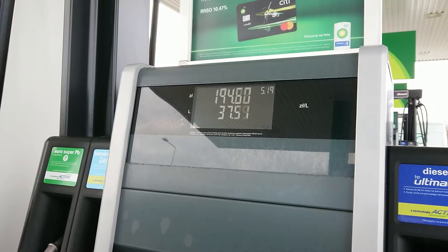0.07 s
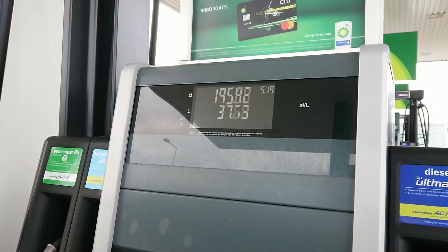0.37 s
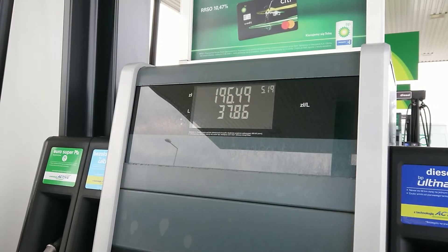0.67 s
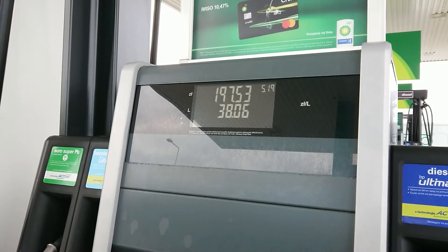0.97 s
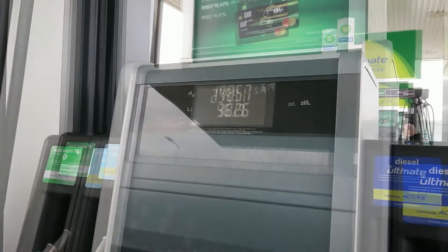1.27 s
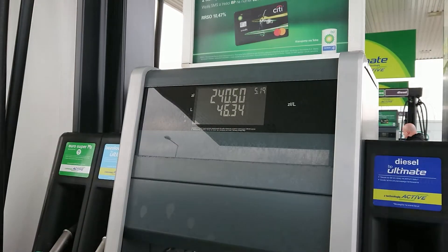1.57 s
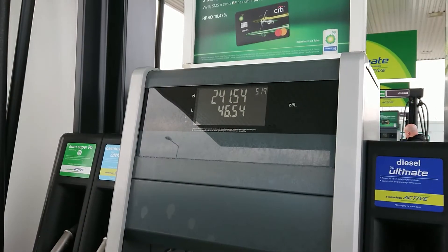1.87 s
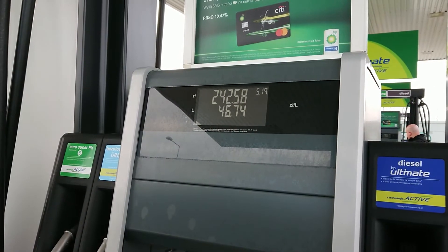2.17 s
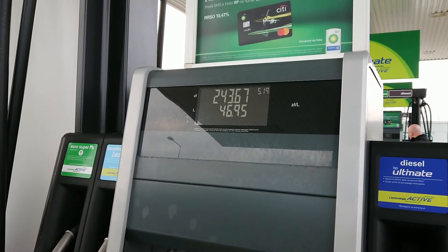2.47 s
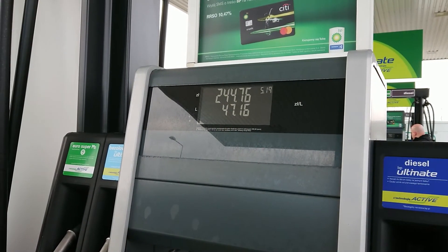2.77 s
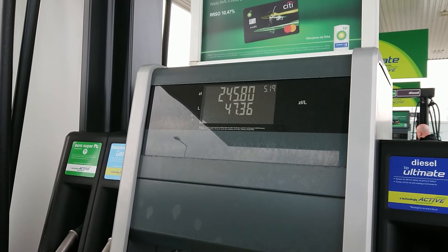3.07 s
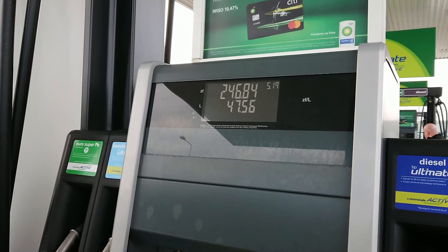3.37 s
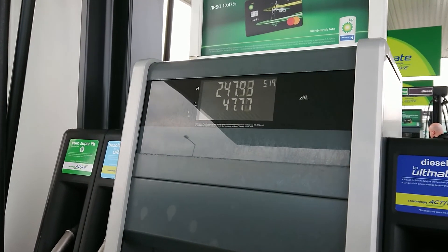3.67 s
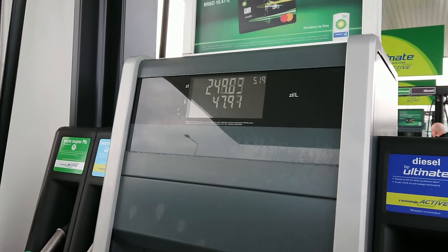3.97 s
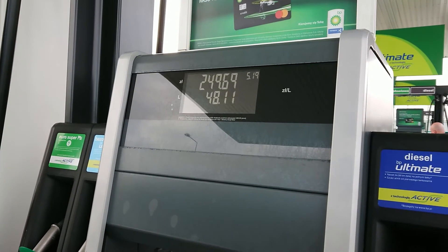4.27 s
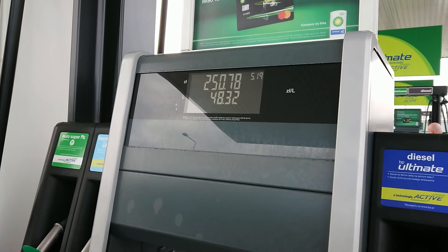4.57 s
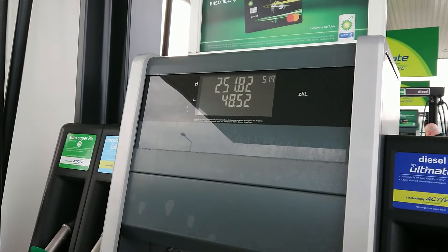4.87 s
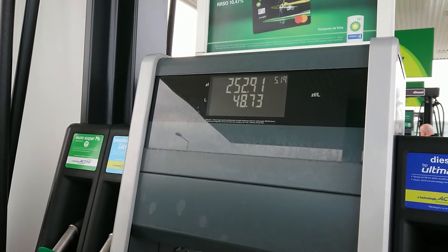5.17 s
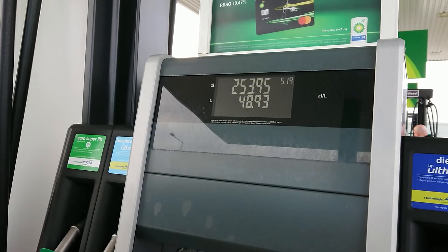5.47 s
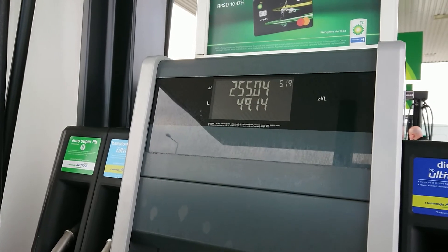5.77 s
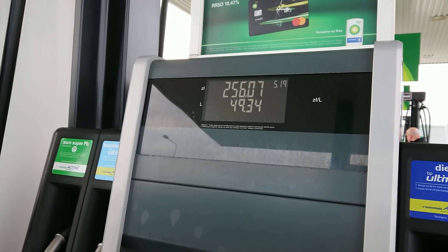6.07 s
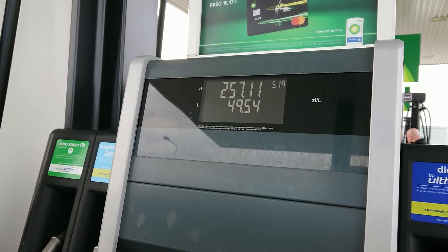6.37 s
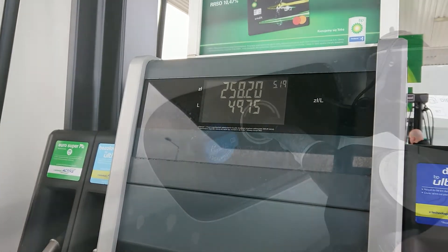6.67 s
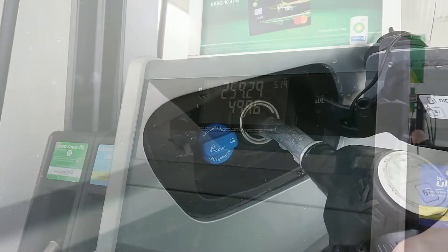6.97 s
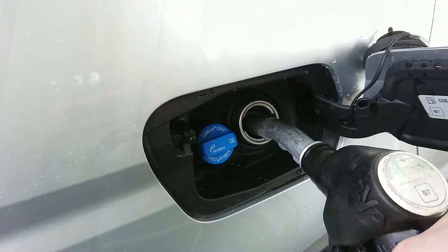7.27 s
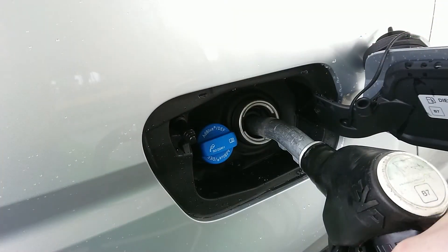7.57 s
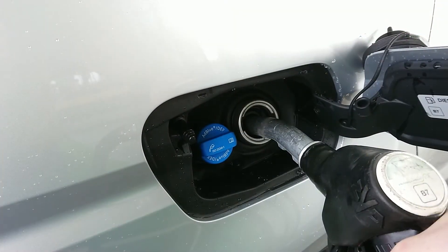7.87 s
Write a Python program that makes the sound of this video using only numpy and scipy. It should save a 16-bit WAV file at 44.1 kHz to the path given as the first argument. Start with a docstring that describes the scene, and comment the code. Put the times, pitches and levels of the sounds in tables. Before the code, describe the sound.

At an open petrol station, a fuel pump hums steadily while fuel rushes through it with a fast fluttering hiss and a thin metallic whine. The sound drops out briefly, then returns with sharp wind pops on the right of the microphone and a hoarse whistle. A few soft bumps follow and distant traffic swells. Near the end it blends into a nozzle spraying fuel into a car's tank with a hollow drone.

```python
"""Fuel dispenser on an open forecourt

A vane pump hums and fuel rushes through the pulsing meter in a sheet-metal cabinet. Distant traffic
swells, there are a few soft bumps, and wind puffs pop on the right microphone port, ducking the gain.
The sound drops out briefly, resumes from a second spot, then fades over to the nozzle running in
the car's filler neck."""
import sys
import numpy as np
from scipy import signal
from scipy.fft import rfft, irfft, next_fast_len
from scipy.io import wavfile
from scipy.ndimage import uniform_filter1d, minimum_filter1d, map_coordinates

SR = 44100
rng = np.random.default_rng(int(sys.argv[2]) if len(sys.argv) > 2 else 0)


def store_pcm(level_fs):
    """Save levels as 16-bit WAV."""
    pcm = np.round(np.clip(level_fs, -1, 1) * 32767).astype(np.int16)
    wavfile.write(sys.argv[1], SR, np.atleast_2d(pcm).T)


N = 354563
TIME_S = np.arange(N) / SR
PUMP_HZ, VANES = 140.45, 9  # vane rate, vanes per shaft turn
DROPOUT_S, RESUME_S = 1.477, 1.782
AT_FIRST_SPOT = TIME_S < DROPOUT_S


def amp(db):
    """Decibels to gain."""
    return 10 ** (np.asarray(db) / 20)


def unit(x):
    """x at rms 1."""
    return x / np.sqrt(np.mean(x ** 2) + 1e-20)


def over_frequency(rows, hz):
    """Each column after the frequency, interpolated on a log axis."""
    knots_hz, *columns = np.transpose(rows)
    return np.array([np.interp(np.log(hz + 1), np.log(knots_hz), c) for c in columns])


def over_time(rows):
    """Each column after the time, interpolated per sample."""
    knots_s, *columns = np.transpose(rows)
    return [np.interp(TIME_S, knots_s, c) for c in columns]


def bell(peak_s, half_width_s):
    """Gaussian of height 1, down to 1/e at the half width."""
    return np.exp(-((TIME_S - peak_s) / half_width_s) ** 2)


def wobble(rate_hz):
    """Smooth random curve with rate_hz knots a second."""
    knots = rng.standard_normal(int(N * rate_hz / SR) + 4)
    return map_coordinates(knots, [np.arange(N) * rate_hz / SR])


def band(width_hz):
    """Complex envelope of narrow-band noise, mean power near 1."""
    return (wobble(width_hz) + 1j * wobble(width_hz)) / np.sqrt(2)


def phase(hz):
    """Phase of a steady rotation."""
    return 2 * np.pi * hz * TIME_S


def rightward(db):
    """Stereo gains, db louder on the right."""
    return amp([[-db / 2], [db / 2]])


def filtered(x, response):
    """x through a frequency response."""
    size = next_fast_len(N + 8192, True)
    return irfft(rfft(x, size) * response(np.fft.rfftfreq(size, 1 / SR)), size)[..., :N]


def ringing(x, modes, ring_db):
    """x with resonances standing out, all raised by ring_db; rms 1."""
    def response(hz):
        power = sum(amp(db) ** 2 / (1 + (2 * (hz - centre) / width) ** 2) for centre, width, db in modes)
        return np.hypot(1, amp(ring_db) * np.sqrt(power))
    return unit(filtered(x, response))


def enclosed(x, ripple_db, spacing_hz):
    """Standing waves ripple level and phase above the bass, differently in each channel; rms 1."""
    level_knots, phase_knots = rng.standard_normal((2, 2, 4096))

    def ripple(knots, hz):
        depth = over_frequency([(600, 0), (2000, 1), (6500, 1), (9000, 0.7)], hz)
        return depth * np.array([map_coordinates(k, [hz / spacing_hz], mode="wrap") for k in knots])

    def response(hz):
        return amp(ripple_db * ripple(level_knots, hz)) * np.exp(2j * ripple(phase_knots, hz / 10))
    return unit(filtered(x, response))


# Left-right likeness: freq_hz, correlation
COHERENCE = [(60, 0.94), (290, 0.97), (640, 0.82), (1400, 0.094), (3000, 0.1)]


def noise(spectrum):
    """Shaped stereo noise, alike in both channels in the bass only; rms 1."""
    def mid_side(hz):
        angle = np.arccos(np.clip(over_frequency(COHERENCE, hz)[0], -1, 1)) / 2
        return np.array([np.cos(angle), np.sin(angle)])
    mid, side = filtered(rng.standard_normal((2, N)), mid_side)
    stereo = np.array([mid + side, mid - side])
    return unit(filtered(stereo, lambda hz: amp(over_frequency(spectrum, hz))))


# Engine and tyre spectra: freq_hz, relative_db
RUMBLE_SPECTRUM = [(24, -52.5), (32, -30), (45, -11), (58, 4.5), (74, 3.5), (95, -2), (125, 0), (200, -9.5),
                   (320, -23.5), (600, -77.5)]
TYRE_SPECTRUM = [(100, -19), (220, 4), (350, -4), (490, -7.5), (720, 1), (1050, 0.5), (1500, -5),
                 (2400, -6.5), (5000, -64.5)]
# Passing vehicles: nearest_s, half_power_s, rumble_db, tyres_db
PASSES = [(3.8, 0.3, -36.5, -47), (4.95, 0.27, -36, -30.5), (6.0, 1.1, -33, -30)]
# Brief swells: peak_s, rumble_rise_db, tyres_rise_db
SWELLS = [(.7, 4, -0.5), (1.27, -1, 2), (3.95, 4.5, -2.5), (5.88, 5.5, -1), (7.57, 5, -10)]


def street(nozzle_share):
    """Three vehicles pass over steady far traffic; at the nozzle the car's body gives shelter."""
    far_rumble_db, far_tyres_db = -36, -39.5

    def shelter(db):
        return np.sqrt(1 - nozzle_share + nozzle_share * amp(db) ** 2)
    near_power = sum(np.outer(amp(levels_db) ** 2, 1 / (1 + ((TIME_S - nearest_s) / half_power_s) ** 2))
                     for nearest_s, half_power_s, *levels_db in PASSES)
    near_rumble, near_tyres = np.sqrt(near_power)
    rumble_rise_db, tyres_rise_db = sum(np.outer(rises_db, bell(peak_s, half_width_s=0.039))
                                        for peak_s, *rises_db in SWELLS)
    rumble = np.hypot(amp(far_rumble_db), near_rumble) * amp(rumble_rise_db + 1.7 * wobble(11))
    tyres = np.hypot(amp(far_tyres_db), near_tyres) * amp(tyres_rise_db + wobble(14))
    return (noise(RUMBLE_SPECTRUM) * rumble * shelter(db=-5) * rightward(db=2.5)
            + noise(TYRE_SPECTRUM) * tyres * shelter(db=-26) * rightward(db=5.5))


# Soft bumps: start_s, thud_db, scuff_db
BUMPS = [(3.055, -40, -31), (3.072, -21, -30), (3.112, -24, -32), (3.195, -23, -42)]
# Scuff spectrum: freq_hz, relative_db
SCUFF_SPECTRUM = [(100, -8), (250, 0), (450, -6), (750, 1), (1200, -6), (2200, -20), (5000, -56)]


def bumps():
    """Each bump is a low, quickly damped thud under a short scuff."""
    thud_hz, rise_s, thud_decay_s, scuff_decay_s = 175, 0.003, 0.011, 0.04
    out = np.zeros((2, N))
    scuff_noise = noise(SCUFF_SPECTRUM)
    for start_s, thud_db, scuff_db in BUMPS:
        age_s = np.maximum(TIME_S - start_s, 0)
        attack = 1 - np.exp(-age_s / rise_s)
        thud = np.sin(2 * np.pi * thud_hz * age_s) * np.exp(-age_s / thud_decay_s)
        scuff = scuff_noise * np.exp(-age_s / scuff_decay_s)
        out += attack * (amp(thud_db) * thud + amp(scuff_db) * scuff)
    return out * rightward(db=5)


def port(x, top_hz, low_hz):
    """The narrow microphone port dulls a pressure blast and leaks its steady part."""
    return filtered(x, lambda hz: 1j * hz / (low_hz + 1j * hz) / np.sqrt(1 + (hz / top_hz) ** 4))


# Wind puffs ahead of the port: peak_s, push_db, suction_db, pitch_hz, thump_db
PUFFS = [(0.0693, 0.5, -21, 480, -36.5), (1.2203, -9, -2.5, 870, -25), (1.2213, -5.5, -12, 220, -28),
         (1.2677, -2, -28, 350, -22), (1.776, 6, 1, 423, -11.5), (1.7954, 5.5, 5.5, 440, -1),
         (1.798, -21, -3, 520, -31), (1.8276, 10, 4.5, 433, -13.5), (1.8332, -10.5, 1, 381, -31),
         (1.8468, 8, 7, 420, -21), (1.8531, -16, 0.5, 423, -31), (1.8696, 8.5, 3, 427, 0.5),
         (1.8755, 3.5, 3.5, 410, -11.5), (1.8784, -4.5, 1, 800, -22), (1.8802, 3.5, -21, 400, -21),
         (1.8812, 9, 5, 390, -16), (1.8898, -6, 5, 430, -2), (1.8968, -11.5, 3.5, 420, -28),
         (3.167, -10.5, -10, 700, -21)]


def wind_pops():
    """An eddy pushes on the right port, snaps over to a gulp of suction and leaves a low thump."""
    push_rise_s, push_decay_s, suction_rise_cycles = 0.00028, 0.00006, 0.2
    thump_hz, thump_decay_s = 125, 0.008
    out = np.zeros((2, N))
    local_s = np.arange(-SR // 100, SR // 20) / SR
    age_s = np.maximum(local_s, 0)
    push = np.exp(np.minimum(local_s, 0) / push_rise_s - age_s / push_decay_s)
    thump = np.sin(2 * np.pi * thump_hz * age_s) * np.exp(-age_s / thump_decay_s)
    for peak_s, push_db, suction_db, pitch_hz, thump_db in PUFFS:
        rise = age_s * pitch_hz / suction_rise_cycles
        suction = np.sin(2 * np.pi * pitch_hz * age_s) * rise * np.exp(1 - rise)
        pop = amp(push_db) * push - amp(suction_db) * suction - amp(thump_db) * thump
        start = round((peak_s + local_s[0]) * SR)
        out[1, start:start + len(pop)] += pop
    return port(out, top_hz=3000, low_hz=45)


def tick(start_s=1.8272, pitch_hz=8640, rise_s=0.00035):
    """One tiny bright tick on the right, amid the puffs."""
    rise = np.maximum(TIME_S - start_s, 0) / rise_s
    return amp(-24.5) * rise * np.exp(1 - rise) * np.sin(phase(pitch_hz)) * rightward(db=10)


# Cabinet panels: pitch_hz, first_spot_db, second_spot_early_db, second_spot_late_db
PANELS = [(1114, -49, -52, -52), (1215, -52, -39.5, -42.5), (1256, -43, -43.5, -38.5),
          (1638, -55, -50, -50), (1799, -53, -52, -52), (2347, -50, -56, -56), (2418, -50, -51, -52),
          (2578, -54, -47, -49), (2751, -51, -42, -42.5), (2800, -51, -48, -45.5), (2832, -46, -48, -48),
          (2961, -53, -48, -49), (3005, -44, -48, -49), (3171, -42.5, -47, -46), (3375, -46, -55, -54),
          (3468, -46.5, -53, -51), (3666, -50, -54, -53), (4358, -49, -53, -53), (4404, -50, -56, -56),
          (4505, -55, -55, -56), (4630, -49, -53, -54), (4716, -52, -55, -55), (4780, -58, -54, -54)]
# Single-panel flares: peak_s, panel_hz, rise_db
FLARES = [(3.4, 3171, 3), (4.25, 2961, 9), (4.3, 3005, 7), (4.45, 4358, 8), (4.9, 3171, 4), (5.5, 3171, 5)]


def panel_whine(shift_span_s=(5.0, 5.7)):
    """Turbulence keeps the panels ringing, flickering; their balance shifts and some flare up."""
    out = np.zeros((2, N))
    for pitch_hz, first_db, early_db, late_db in PANELS:
        level_db = np.where(AT_FIRST_SPOT, first_db, np.interp(TIME_S, shift_span_s, [early_db, late_db]))
        flare_db = sum(rise_db * bell(peak_s, half_width_s=0.29)
                       for peak_s, panel_hz, rise_db in FLARES if panel_hz == pitch_hz)
        flicker = 1 + 0.55 * wobble(13) + 0.55j * wobble(13)
        tone = np.exp(1j * (phase(pitch_hz) + wobble(5)))
        channel_phasors = np.exp(1j * rng.normal(0, 0.6, (2, 1)))
        pan = rightward(db=np.interp(pitch_hz, [3100, 4200], [6, -6]))
        out += amp(level_db + flare_db) * pan * (channel_phasors * flicker * tone).real
    return out


# Vane-rate harmonics: order, dispenser_db, nozzle_db
PUMP_HARMONICS = [(1, -35, -37.5), (2, -32, -43), (4, -45, -53), (5, -44, -51), (6, -48, -70),
                  (7, -48, -55), (9, -56.5, -45)]


def pump_hum(nozzle_share):
    """Vane tones, the lowest swaying once per shaft turn, plus the panels' thin whine."""
    vane_phase = phase(PUMP_HZ) + 0.065 * wobble(3.7)
    dispenser_gain = amp(1.06) * (1 - nozzle_share)
    tones = np.zeros(N)
    for order, dispenser_db, nozzle_db in PUMP_HARMONICS:
        # Reflections scatter phase and level, more so in the higher tones.
        scatter_rad = rng.normal(0, 0.31 * order) + 0.06 * order * wobble(9)
        waver_db = 0.36 * order * wobble(5)
        gain = dispenser_gain * amp(dispenser_db) + nozzle_share * amp(nozzle_db)
        tones += gain * amp(waver_db) * np.cos(order * vane_phase + scatter_rad)
    sway = amp(-37) * np.cos(vane_phase / VANES) * np.cos(vane_phase)
    whine = dispenser_gain * amp(0.74) * panel_whine()
    return np.sqrt(2) * tones * rightward(db=5) + sway * rightward(db=1.5) + whine


# Spray spectrum: freq_hz, left_relative_db, right_relative_db
SPRAY_SPECTRUM = [(120, 7.5, 9.5), (330, 0.5, 1.5), (800, -12.5, 0.5), (1170, -0.5, -3), (1600, -13, -3),
                  (2080, -5, -11.5), (2420, 2, -11), (4090, 1.5, -20), (4870, 2, 1), (5600, -8.5, -10.5),
                  (6560, -5, -25), (8160, -18, -26), (11950, -33, -26), (15000, -48, -40.5)]
# Filler neck resonances: centre_hz, width_hz, relative_db
NECK_MODES = [(1035, 25, -4), (1170, 40, 1), (1262, 32, 6), (1539, 50, -9), (2185, 40, -3), (2444, 60, -1),
              (2530, 40, -4), (2648, 55, 0), (2770, 40, -3), (3219, 65, -1), (3340, 50, -4), (3470, 40, -4),
              (3983, 55, -5), (4446, 50, -2), (4651, 50, -1), (4850, 70, -6), (5717, 50, -3),
              (6061, 45, -2), (6610, 60, -4), (6912, 60, -4)]
# Filler neck drone: time_s, lower_tone_db, upper_tone_db
DRONE_LEVELS = [(6.3, -58, -48), (6.7, -46, -29), (7.0, -42, -35), (7.3, -39.5, -42.5), (7.72, -40.5, -39),
                (8.0, -39.5, -43)]


def nozzle(drone_hz=(420, 562), froth_hz=70):
    """The jet sprays into the filler neck, whose air column drones hoarsely, wavering with the froth."""
    spray = enclosed(noise(SPRAY_SPECTRUM), ripple_db=1.8, spacing_hz=30)
    spray = ringing(spray, NECK_MODES, ring_db=7)
    bend_s = np.cumsum(0.011 * wobble(14)) / SR  # both tones bend together
    drone = np.zeros(N)
    for pitch_hz, level_db in zip(drone_hz, over_time(DRONE_LEVELS)):
        froth = unit(np.abs(1 + band(froth_hz))) * np.exp(0.7j * wobble(froth_hz))
        drone += amp(level_db) * (froth * np.exp(2j * np.pi * pitch_hz * (TIME_S + bend_s))).real
    return spray * amp(-29.5 + 1.44 * wobble(25)) + np.sqrt(2) * drone * rightward(db=7)


# Valve whistle: time_s, centre_hz, level_db
VALVE_TRACK = [(1.8, 2727, -35), (2.5, 2720, -32), (2.9, 2780, -36.5), (4.3, 2813, -38.5), (5.0, 2780, -34),
               (6.3, 2804, -36.5), (7.2, 2798, -33)]


def valve(width_hz=120):
    """Fuel whistles hoarsely through a valve: narrow-band noise with a drifting centre."""
    centre_hz, level_db = over_time(VALVE_TRACK)
    hoarseness = np.array([band(width_hz) for channel in range(2)])
    carrier = np.exp(2j * np.pi * np.cumsum(centre_hz) / SR)
    return amp(level_db) * unit((hoarseness * carrier).real) * rightward(db=7.5)


# Pipe flow spectrum at each spot: freq_hz, left_relative_db, right_relative_db
FIRST_RUSH_SPECTRUM = [(150, -16, -19), (350, 1.5, -3.5), (500, -29.5, -4.5), (914, -19, -10.5),
                       (1230, -8.5, -1.5), (1400, -16, -8.5), (2212, -13.5, -4.5), (2750, -7.5, -2.5),
                       (3300, -15, 1.5), (3670, -10.5, -5.5), (4150, -15.5, -12), (5540, -25.5, -17),
                       (6000, -39, -46.5), (8000, -74.5, -76.5)]
SECOND_RUSH_SPECTRUM = [(150, -28, -14.5), (310, 2, 1), (506, -20, -7), (960, -21, -5.5), (1284, -12, 4),
                        (1297, -18, -4.5), (2290, -12.5, -2), (2570, -16, 2), (3380, -15, -1.5),
                        (3660, -3.5, -11.5), (4060, -18, -18), (5370, -49, -22), (6000, -36, -39),
                        (8000, -74, -73.5)]
# Cabinet resonances at each spot: centre_hz, width_hz, relative_db
FIRST_CABINET_MODES = [(2207, 16, -3), (2274, 16, -5), (2465, 16, -1), (2594, 16, -5), (2715, 30, -5),
                       (2800, 60, -3), (2900, 30, -6), (3100, 30, -6), (3205, 25, -2), (3250, 22, -2),
                       (3313, 18, 0), (3784, 22, -4), (3919, 16, -6), (3997, 16, -3), (4180, 16, -3),
                       (4228, 18, 0)]
SECOND_CABINET_MODES = [(1680, 25, -7), (2245, 25, -4), (2290, 30, -4), (2470, 20, -6), (2560, 30, -6),
                        (2660, 45, -5), (2965, 30, -4), (3185, 45, -2), (3465, 25, -6), (3678, 30, -3)]


def pipe_rush():
    """Turbulent fuel in the pipes, heard through the cabinet; the valve joins at the second spot."""
    first_flow = enclosed(noise(FIRST_RUSH_SPECTRUM), ripple_db=2.6, spacing_hz=12)
    second_flow = enclosed(noise(SECOND_RUSH_SPECTRUM), ripple_db=2.0, spacing_hz=12)
    first = amp(-27.5) * ringing(first_flow, FIRST_CABINET_MODES, ring_db=7)
    second = amp(-25.5) * ringing(second_flow, SECOND_CABINET_MODES, ring_db=7)
    return np.where(AT_FIRST_SPOT, first, second + valve())


def whistle(start_s=5.92, pitches_hz=(6485, 6610), levels_db=(-54, -57.5)):
    """A thin double whistle sets in on the left and stays."""
    tones = sum(amp(db) * (band(width_hz=55) * np.exp(1j * phase(hz))).real
                for hz, db in zip(pitches_hz, levels_db))
    return tones * (TIME_S > start_s) * rightward(db=-16)


# Meter hiss spectrum: freq_hz, left_relative_db, right_relative_db
HISS_SPECTRUM = [(2000, -24, -43), (3400, -10.5, -5), (4100, 0.5, -11.5), (4610, -1.5, -16),
                 (5020, -8.5, -20.5), (6000, -12.5, -43.5), (6650, -12, -46.5), (7640, -20, -35),
                 (8500, -22, -27), (9600, -19.5, -34), (11030, -23, -55.5), (13000, -20, -69.5),
                 (14600, -25, -78), (15600, -42.5, -69)]
# Meter resonances: centre_hz, width_hz, relative_db
METER_MODES = [(4300, 25, -5), (4357, 20, -1), (4403, 20, -3), (4473, 18, 2), (4505, 25, 0), (4570, 20, -2),
               (4655, 40, 1), (4712, 20, -1), (4778, 22, 2), (4890, 25, -1), (6480, 70, -4), (6610, 60, -4)]


def meter_hiss():
    """Fuel squeezes through the meter: a resonant hiss with the whistle on top."""
    flow = enclosed(noise(HISS_SPECTRUM), ripple_db=2.9, spacing_hz=14)
    level_db = np.where(AT_FIRST_SPOT, -34.5, -32.5)
    return amp(level_db) * ringing(flow, METER_MODES, ring_db=2.5) + whistle()


def meter_strokes(piston_hz=20.1):
    """Relative level swing: piston strokes beat against the pump shaft; each vane adds a pulse."""
    piston, shaft, vane = phase(piston_hz), phase(PUMP_HZ / VANES), phase(PUMP_HZ)
    beat = piston - shaft
    surge = 1.7 * np.sin(piston) + 0.32 * np.sin(2 * piston) - np.cos(shaft)
    beating = 0.83 * np.cos(shaft - beat) + 0.2 * np.sin(beat)
    vane_pulses = 0.94 * np.cos(vane) + 0.5 * np.cos(2 * vane)
    return surge + beating + vane_pulses + 0.5 * wobble(60)


# Flow loudness drift, taken about its mean: time_s, rush_db, hiss_db
FLOW_DRIFT = [(3.0, -30, -37), (4.86, -30.5, -36.5), (6.09, -31, -38), (6.18, -30.5, -37),
              (6.6, -31.5, -37.5)]
# Spits in the hiss: peak_s, rise_db
SPITS = [(0.062, 3), (0.26, 3), (5.935, 3), (6.19, 2.5), (6.83, 2)]


def dispenser():
    """The meter's strokes pump the hiss strongly, the deeper rush a little; at times the hiss spits."""
    swing = meter_strokes()
    rush_drift_db, hiss_drift_db = (db - db.mean() for db in over_time(FLOW_DRIFT))
    spit_db = sum(rise_db * bell(peak_s, half_width_s=0.017) for peak_s, rise_db in SPITS)
    rush = amp(rush_drift_db + 0.31 * swing) * pipe_rush()
    hiss = amp(hiss_drift_db + spit_db + 0.81 * swing) * meter_hiss()
    return rush + hiss


# Crossfade to the nozzle: time_s, nozzle_share
CROSSFADE = [(6.6, 0), (7.0, 0.27), (7.35, 0.94)]


def scene():
    """The dispenser gives way to the nozzle; hum and street carry through."""
    nozzle_share = over_time(CROSSFADE)[0]
    fuel = np.sqrt(1 - nozzle_share) * dispenser() + np.sqrt(nozzle_share) * nozzle()
    return fuel + pump_hum(nozzle_share) + street(nozzle_share) + bumps() + wind_pops() + tick()


def gain_control(x, ceiling=0.84, recovery_s=0.71, window_samples=129):
    """A peak over the ceiling ducks both channels; the gain creeps back."""
    peak = np.abs(x).max(axis=0) + 1e-9
    needed_gain = minimum_filter1d(np.minimum(1, ceiling / peak), size=window_samples)
    recovery = np.exp(-TIME_S / recovery_s)
    log_gain = np.minimum.accumulate(np.log(needed_gain) / recovery) * recovery
    return x * np.exp(uniform_filter1d(log_gain, size=window_samples))


def record(dry):
    """Low cut, gain control, a fade into the brief dropout, and a band limit."""
    low_cut_hz, top_hz = 31, 15600
    fade_start_s, fade_db_per_s = 1.23, 18.5
    low_cut = signal.butter(3, low_cut_hz, "highpass", fs=SR, output="sos")
    levelled = gain_control(signal.sosfilt(low_cut, dry))
    fade = amp(-fade_db_per_s * np.maximum(TIME_S - fade_start_s, 0))
    fader = np.where(AT_FIRST_SPOT, fade, TIME_S > RESUME_S)
    return filtered(levelled * fader, lambda hz: hz < top_hz)


dry = scene()
out = record(dry)
store_pcm(out)
```